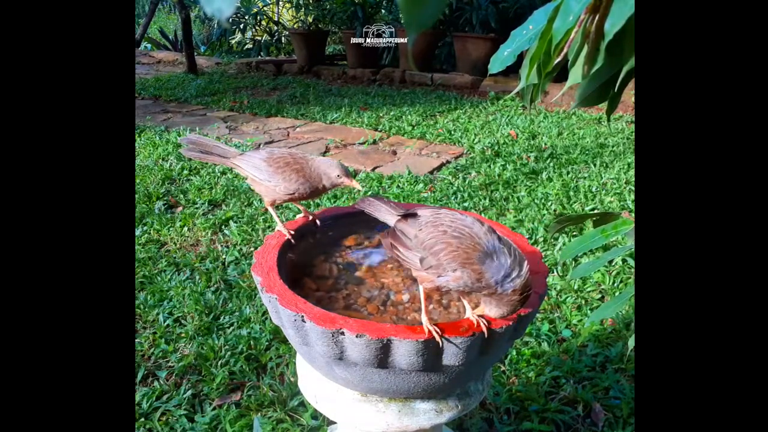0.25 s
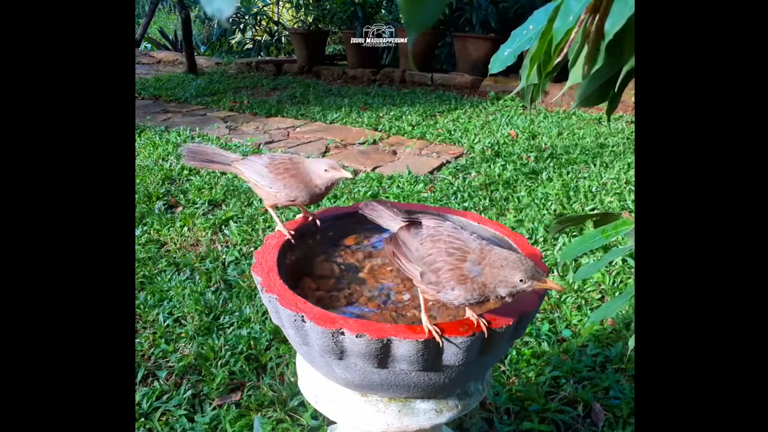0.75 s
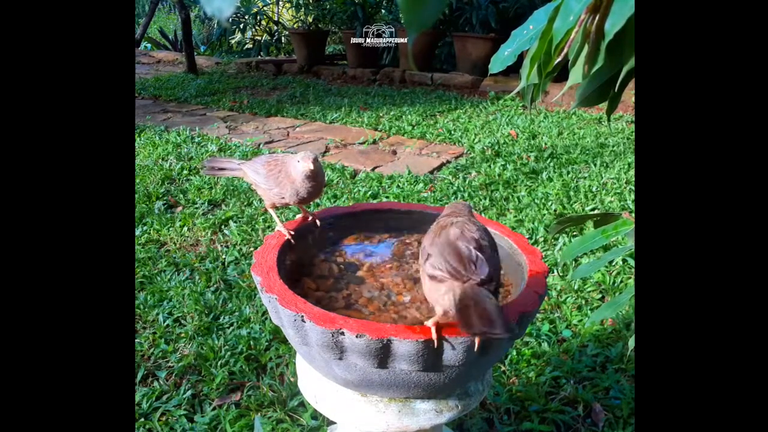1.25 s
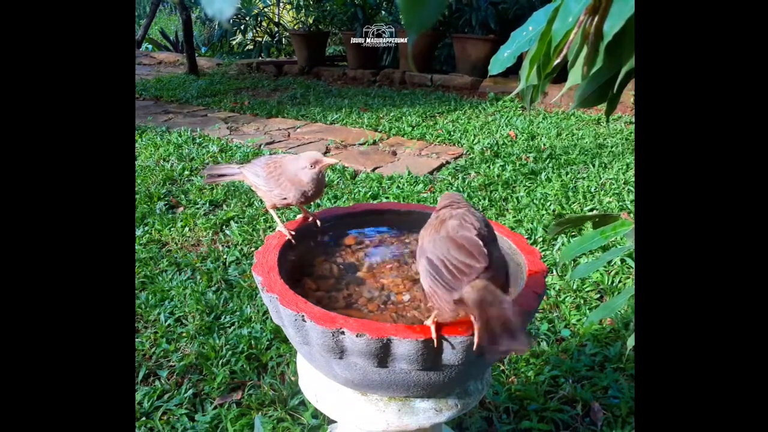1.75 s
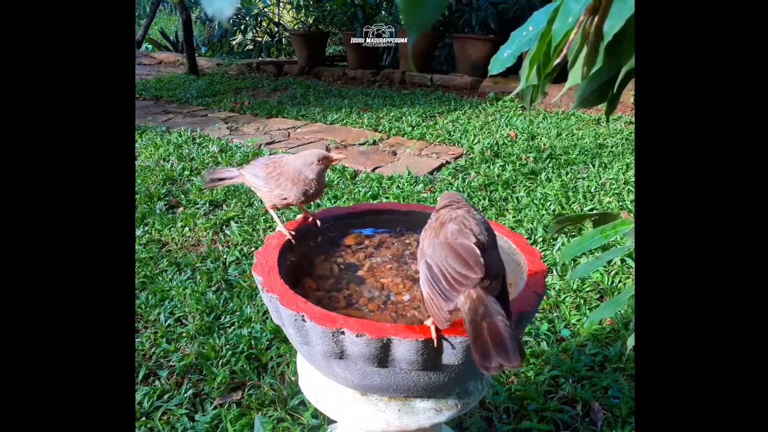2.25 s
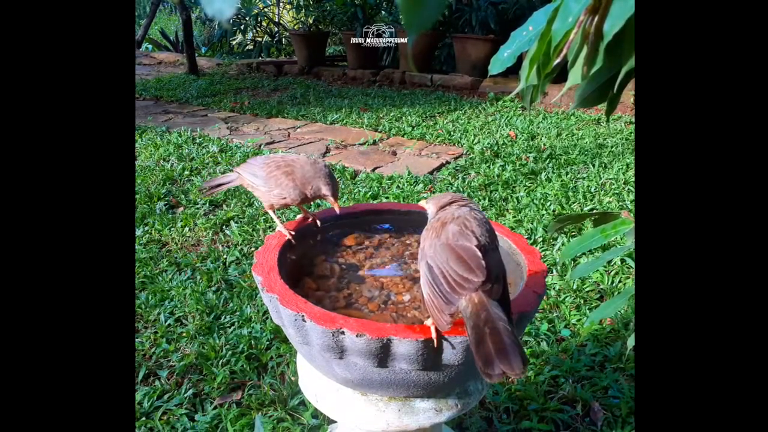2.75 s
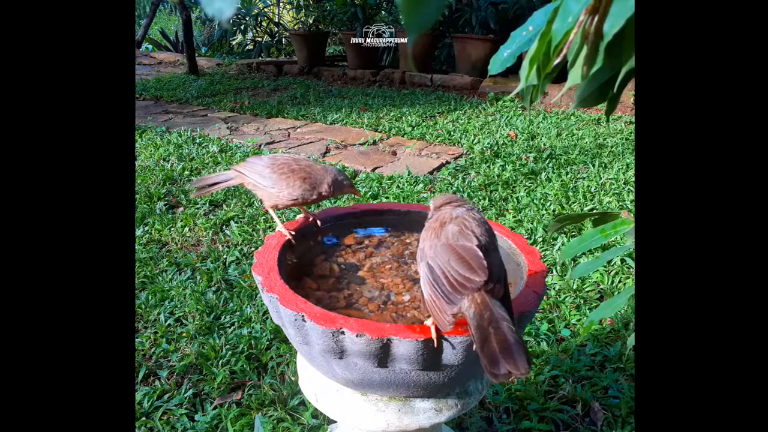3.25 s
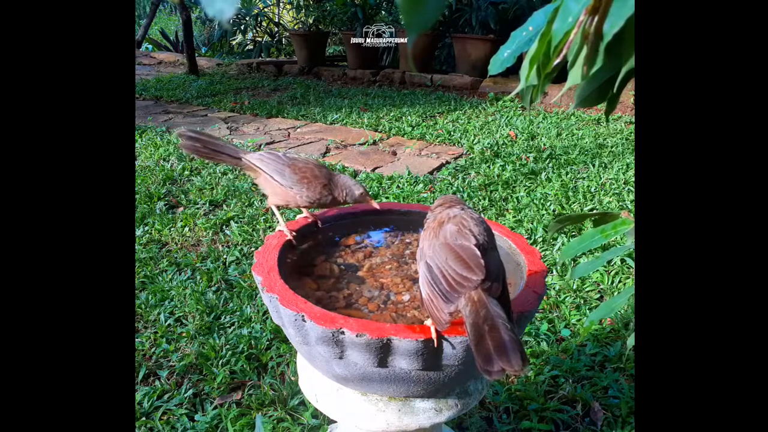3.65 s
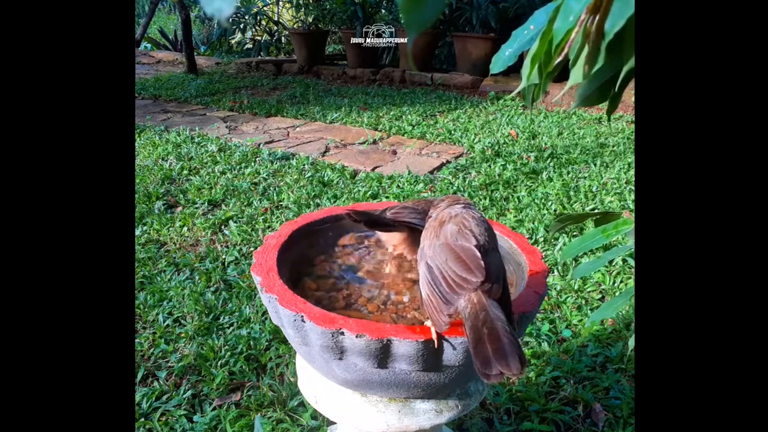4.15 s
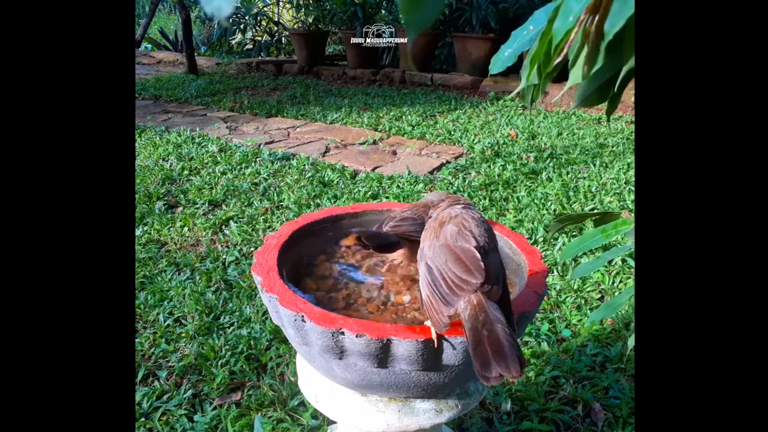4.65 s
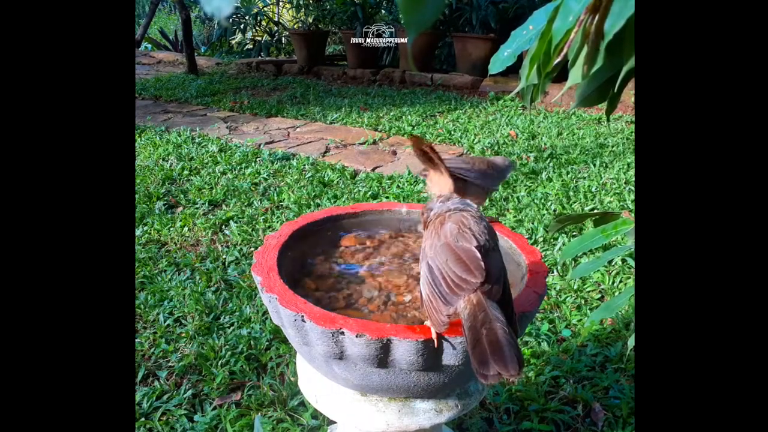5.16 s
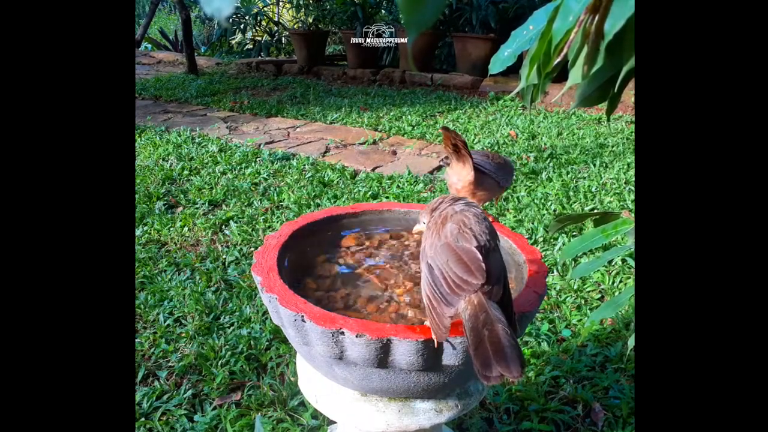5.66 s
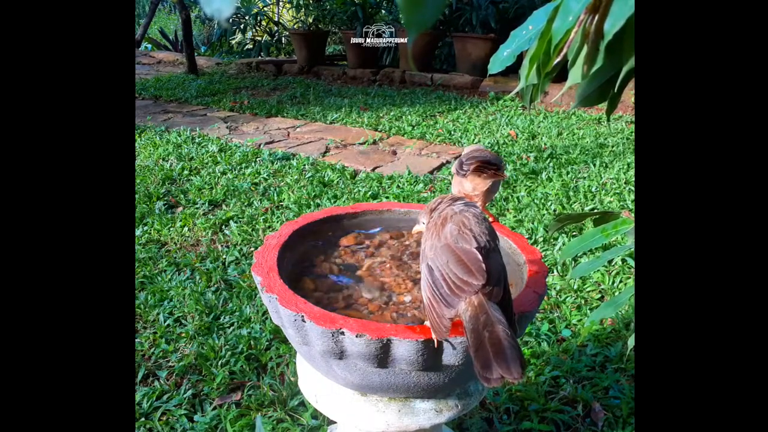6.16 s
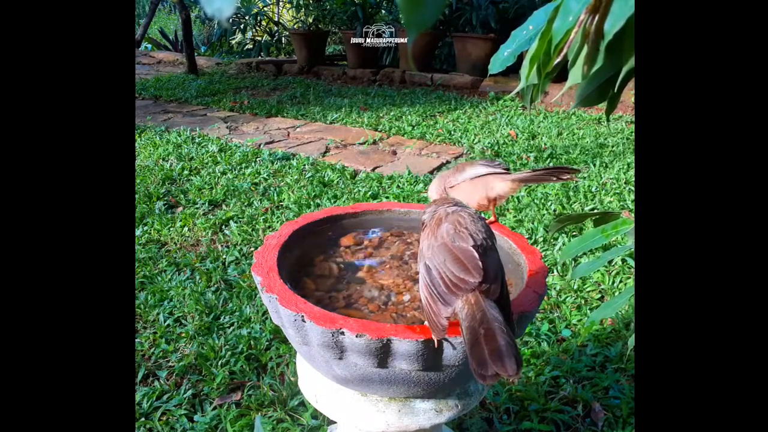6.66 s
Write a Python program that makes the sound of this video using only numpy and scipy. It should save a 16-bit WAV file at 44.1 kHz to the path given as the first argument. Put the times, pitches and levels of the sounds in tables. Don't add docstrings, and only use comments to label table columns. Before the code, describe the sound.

Birds at a garden bath ruffle feathers and coo softly, one chirps and drops in with a loud watery plop, over insects and distant engine hum.

```python
import sys
import numpy as np
from scipy import signal
from scipy.fft import rfft, irfft, next_fast_len
from scipy.io import wavfile
from scipy.ndimage import map_coordinates

SR = 44100
rng = np.random.default_rng(int(sys.argv[2]) if len(sys.argv) > 2 else 0)


def waveform_to_disk(signal):
    frames = np.transpose(np.atleast_2d(signal))
    scaled = np.clip(frames, -1, 1) * 32767
    samples = np.round(scaled).astype(np.int16)
    wavfile.write(sys.argv[1], SR, samples)


def voltage_ratio(level):
    return 10 ** (np.asarray(level, float) / 20)


N = 304731


def unit(x):
    return x / np.sqrt(np.mean(x ** 2) + 1e-20)


def along(points, hz):
    f, v = np.transpose(points)
    return np.interp(np.log(hz + 1), np.log(f + 1), v)


def wobble(rate, size=N):
    knots = rng.standard_normal(int(size * rate / SR) + 4)
    return map_coordinates(knots, [np.arange(size) * rate / SR])


def filtered(x, response):
    m = next_fast_len(x.shape[-1] + 8192)
    spectrum = rfft(x, m) * response(np.fft.rfftfreq(m, 1 / SR))
    return irfft(spectrum, m)[..., :x.shape[-1]]


def peak(hz, width_hz):
    return lambda f: 1j * f * width_hz / (hz * hz - f * f + 1j * f * width_hz)


def add(out, s, x):
    x = x[:, max(0, -round(s * SR)):]
    part = out[:, max(0, round(s * SR)):][:, :x.shape[1]]
    part += x[:, :part.shape[1]]


def placed(x, pan_db, lag, wet_db, scale=1, rise=0.0031, alike=0.092):
    # (frequency [Hz], t60 [s])
    tree_decay = [(500, 0.49), (2000, 0.72), (5000, 0.74), (10000, 0.7)]
    noise = rng.standard_normal((3, int(SR * min(.5, .05 + .6 * scale))))
    hz, t, z = signal.stft(noise[:2] + alike * noise[2], SR, nperseg=256)
    swell = 1 - np.exp(-(t + 0.0026) / rise)
    decay = voltage_ratio(-60 * t / (scale * along(tree_decay, hz))[:, None])
    tail = signal.istft(z * swell * decay, SR, nperseg=256)[1]
    wet = signal.fftconvolve(x[None], tail / np.linalg.norm(tail[0]), axes=1)
    delays = np.array([[60 + lag], [60 - lag]])
    direct = np.pad(x, (0, wet.shape[1] - len(x)))
    direct = filtered(direct, lambda f: np.exp(-1j * np.pi * f / SR * delays))
    return (direct + voltage_ratio(wet_db) * wet) * voltage_ratio(np.array([[pan_db / 2], [-pan_db / 2]]))


def coo(out, s, hz, db, wet_db):
    breath = 1 + voltage_ratio(-16) * wobble(400, size=len(hz))
    gain = voltage_ratio(db + 4.0 + 1.4 * wobble(58.6, size=len(hz))) * breath
    voice = gain * np.sin(2 * np.pi * np.cumsum(hz) / SR)
    add(out, s, placed(voice, pan_db=5.0, lag=-11, wet_db=wet_db, scale=0.54, rise=0.014, alike=0.068))


def doves(out):
    # (time [s], length [s], chest pitch [Hz], time in high register [s], level [dB])
    near_coos = [
        (-.07, 0.45, 685.4, 0.24, -48.5),
        (0.864, 0.44, 669.3, 0.24, -52.5),
        (1.523, .41, 653.7, .14, -53),
        (2.179, 0.38, 655.3, 0, -53),
    ]
    # (time [s], length [s], first pitch [Hz], last pitch [Hz], level [dB])
    murmurs = [
        (0.282, .14, 773, 739, -55.5),
        (.34, 0.13, 671, 660, -57.5),
        (0.738, 0.11, 626, 712, -57.5),
        (.8, 0.121, 837, 761, -52),
        (0.899, 0.246, 802, 781, -54.5),
        (1.24, 0.07, 875, 816, -57),
        (6.703, 0.16, 580, 617, -75),
    ]
    scoop_hz, scoop_s = 71, 0.0407
    sag_hz, sag_power = 95, 5.53
    break_s, leap_s, return_s, high_db = .122, 0.0049, .009, 5
    leap_hz, leap_sag_hz_per_s = 104.96, 200.3
    quaver_hz = 8.2
    swell_s, fade_s, tire_db = 0.075, 0.057, 7

    def switch(t, width_s):
        return (1 + np.tanh(t / width_s)) / 2

    for s, length, chest_hz, high_s, db in near_coos:
        t = np.arange(0, length, 1 / SR)
        fall_back = switch(break_s + high_s + return_s - t, return_s)
        high = switch(t - break_s, leap_s) * fall_back * (high_s > .03)
        chest = chest_hz - scoop_hz * np.exp(-t / scoop_s) - sag_hz * (t / length) ** sag_power
        leap = leap_hz - leap_sag_hz_per_s * (t - break_s) + quaver_hz * wobble(44.9, size=len(t))
        shape = np.clip(np.minimum(t / swell_s, (length - t) / fade_s), 1e-3, 1)
        level_db = db + high_db * high - tire_db * (t / length) ** 5.4 + 20 * np.log10(shape)
        coo(out, s, chest + high * leap, level_db, wet_db=-3.0)
    for s, length, first_hz, last_hz, db in murmurs:
        u = np.linspace(0, 1, int(length * SR))
        arch_db = 7 * np.log10(np.sin(np.pi * u) ** 2 + 1e-6)
        coo(out, s, first_hz + (last_hz - first_hz) * u, db + arch_db, wet_db=-0.5)


def insects():
    # (frequency [Hz], width [Hz], click rate [1/s], pulsing [0-1], level [dB])
    choirs = [(10410, 470, 110, 0.36, -60), (8205, 390, 121, 0.1, -65.5), (7370, 990, 61, 0.16, -69.5)]
    # (period [s], time of one crest [s], depth [dB])
    surges = [(1.34, 1.14, 3.5), (2.7, 1.33, 0.5), (.655, 1.15, 2.5)]
    t, total = np.arange(N) / SR, 0
    for (hz, width_hz, rate, pulsing, db), (every, crest, depth_db) in zip(choirs, surges):
        beat = 1 + pulsing * np.sin(2 * np.pi * rate * t + 2.4 * wobble(6))
        band = filtered(
            beat * rng.standard_normal((2, N)),
            lambda f: peak(hz, width_hz)(f) * peak(hz, 2.5 * width_hz)(f) / (1 + (f / 11400) ** 40))
        surge_db = depth_db * np.cos(2 * np.pi * (t - crest) / every)
        total = total + unit(band) * voltage_ratio(db + surge_db + 1.1 * wobble(9.5) + np.array([[1.1], [-1.1]]))
    bout_every_s, bout_at_s, bout_sharpness = 0.5, 1.27, 3.6
    bouts = np.cos(np.pi * (t - bout_at_s) / bout_every_s) ** 2
    trill = filtered(rng.standard_normal((2, N)), lambda f: peak(7250, 150)(f) ** 2)
    return total + voltage_ratio(-65.5) * unit(trill) * bouts ** bout_sharpness


def engine():
    # (frequency [Hz], width [Hz], level [dB])
    hum_lines = [(33.28, 1, -62), (54.39, 1.1, -59.5), (66.87, 2.07, -57.5), (75.26, 2.1, -66.5),
                 (226.2, 3.4, -77.5)]
    total = 0
    for hz, width_hz, db in hum_lines:
        line = filtered(rng.standard_normal(N), lambda f: peak(hz, width_hz)(f) ** 2)
        total = total + voltage_ratio(db) * unit(line)
    return total * voltage_ratio(np.array([[.55], [-.55]]))


def air():
    # (frequency [Hz], density [dB per Hz])
    floor_spectrum = [(12, -23), (20, -10.5), (74, -2.5), (136, -11), (478, -26.5), (1070, -33),
                      (1970, -36), (5690, -44.5), (7110, -31), (8170, -28.5), (8880, -29.5), (10200, -15),
                      (11400, -28), (12400, -76), (15500, -61)]
    # (frequency [Hz], correlation [0-1])
    likeness = [(30, 0.98), (125, 0.94), (300, 0.67), (1000, 0.0009), (4000, 0), (12000, 0.11)]

    def spread(f):
        turn = np.arccos(np.clip(along(likeness, f), -1, 1)) / 2
        return voltage_ratio(along(floor_spectrum, f)) * [np.cos(turn), np.sin(turn)]

    mid, side = filtered(rng.standard_normal((2, N)), spread)
    level_db = -54 + 0.6 * wobble(1.16) + np.array([[.55], [-.55]])
    return voltage_ratio(level_db) * unit(np.array([mid + side, mid - side]))


def far_birds(out, calls, overtones, wet_db, scale, pan_db, warble_hz, warble_rate):
    for s, length, first_hz, last_hz, db in calls:
        u = np.linspace(0, 1, int(length * SR))
        glide_hz = last_hz + (first_hz - last_hz) * np.exp(-3.5 * u)
        phase = 2 * np.pi * np.cumsum(glide_hz + warble_hz * wobble(warble_rate, size=len(u))) / SR
        tone = sum(voltage_ratio(level_db) * np.sin(k * phase) for k, level_db in overtones)
        voice = voltage_ratio(db + 8.5 - wet_db) * np.sin(np.pi * u) ** 0.14 * tone
        add(out, s, placed(voice, pan_db, lag=-14.0, wet_db=wet_db, scale=scale, rise=0.0055, alike=0.41))


def feathers(out):
    # (middle [s], length [s], level [dB], dullness [0-1, below 0 brighter])
    rustles = [(0.258, 0.064, -56.5, 0), (0.32, 0.087, -58.5, 0.2), (0.394, 0.073, -47.5, 0.22),
               (0.441, 0.12, -50, 0.3), (0.558, 0.12, -62, 0.1), (0.695, 0.074, -60.5, .3),
               (0.848, 0.28, -61, 0.25), (1.099, 0.25, -66, .2), (1.628, 0.14, -66, 0),
               (3.952, 0.021, -56.5, 0.2), (3.993, 0.046, -54.5, 0.96), (5.098, 0.031, -54, -.2),
               (5.202, 0.069, -62.5, -.5), (5.381, 0.062, -56, -.5), (5.596, 0.042, -64, 0),
               (5.697, 0.11, -68, 0), (4.903, 0.032, -68, 0.4), (1.519, 0.071, -77, 0.2),
               (1.241, 0.061, -67, 1), (6.748, 0.016, -59.5, 0.8), (6.827, 0.14, -65, 0.5)]
    # (time [s], level [dB])
    wingbeats = [(.4, -54), (.45, -55.5), (0.521, -60), (0.781, -56), (0.839, -55.5), (0.899, -58),
                 (0.968, -57), (1.05, -57.5), (1.107, -56), (1.169, -63), (1.23, -58), (1.3, -66)]
    for s, length, db, dull in rustles:
        n = int(2 * length * SR)
        grains = rng.standard_normal((2, n)) * voltage_ratio(3.35 * wobble(600, size=n))

        def hiss(f):
            dulling = voltage_ratio(-9 * dull * np.log2(1 + f / 1500))
            return (f / (f + 900)) ** 2 * dulling / (1 + (f / 14800) ** 8)

        grains = filtered(grains + 0.038 * grains[::-1], hiss)
        add(out, s - length, voltage_ratio(db) * unit(grains) * np.hanning(n) ** 1.28)
    for s, db in wingbeats:
        push = filtered(rng.standard_normal(1100), lambda f: peak(350, 900)(f) / (1 + (f / 1000) ** 4))
        push = voltage_ratio(db) * unit(push) * np.hanning(1100)
        add(out, s - .012, push * voltage_ratio(np.array([[.6], [-.6]])))


def rim_ticks(out):
    # (time [s], peak level [dB], ring [Hz], t60 [s], left over right [dB])
    ticks = [(0.375, -42, 4670, 0.0087, .5), (3.934, -56, 4300, 0.0078, 0), (3.955, -49, 5600, 0.0099, 1),
             (3.974, -44, 2960, .008, -4), (3.9779, -28.5, 8400, 0.0038, -6),
             (3.986, -38, 6200, 0.0076, 10), (4.439, -44.5, 2940, 0.0053, -.5),
             (6.671, -49, 1680, 0.0074, 7), (6.7426, -36, 5900, 0.0025, 7),
             (6.746, -46.5, 2790, 0.0092, -1), (6.751, -49, 2800, .005, 1), (6.8166, -38, 2920, 0.0023, 1)]
    t = np.arange(SR // 10) / SR
    for s, db, hz, t60, pan_db in ticks:
        snap = 0.99 * rng.standard_normal(len(t)) + np.sin(2 * np.pi * hz * t)
        snap = snap * voltage_ratio(-60 * t / t60)
        snap = filtered(snap, lambda f: f / (f - 1200j) / (1 + (f / 11000) ** 6))
        add(out, s - .0007, placed(voltage_ratio(db) * snap, pan_db, lag=-.3, wet_db=-14, scale=.08))


def chirp(out):
    length_s, edge_s = 0.037, .011
    start_hz, fall_hz_per_s = 3688, 18500
    t = np.arange(0, length_s, 1 / SR)
    phase = 2 * np.pi * np.cumsum(start_hz - fall_hz_per_s * t) / SR
    shape = np.clip(np.minimum(t, length_s - t) / edge_s, 0, 1) ** 2.3
    shape = shape * voltage_ratio(0.84 * wobble(53, size=len(t)))
    octave = voltage_ratio(5 - 6.5 * t / length_s) * np.sin(2 * phase)
    twelfth = voltage_ratio(-10) * np.sin(3 * phase)
    voice = voltage_ratio(-36) * shape * (np.sin(phase) + octave + twelfth)
    add(out, 3.506, placed(voice, pan_db=-5.5, lag=-1.8, wet_db=-20, scale=0.29, alike=0.42))


def plop(out):
    # (time [s], peak level [dB], pitch [Hz], t60 [s])
    bubbles = [
        (3.9765, -17, 980, 0.019),
        (3.948, -53.5, 1900, 0.048),
    ]
    late_db, late_t60_s = -18.5, 0.18
    t = np.arange(SR // 10) / SR
    for s, db, hz, t60 in bubbles:
        phase = 2 * np.pi * hz * (t + 0.00071 * (1 - np.exp(-t / 0.00076)))
        ring = voltage_ratio(-60 * t / t60) + voltage_ratio(late_db - 60 * t / late_t60_s)
        burst = 1 / (1 + (t / 0.026) ** 12)
        onset = 1 - np.exp(-t / .0008)
        bubble = voltage_ratio(db) * ring * burst * onset * np.sin(phase)
        add(out, s, placed(bubble, pan_db=1.2, lag=-2.2, wet_db=-24, scale=.2))


def scene():
    # (time [s], length [s], first pitch [Hz], last pitch [Hz], level [dB])
    far_calls = [(0.135, 0.043, 4110, 3340, -76), (0.389, 0.075, 3500, 2454, -64.5),
                 (0.834, 0.07, 3816, 3925, -61.5), (0.872, 0.0384, 4000, 4240, -59),
                 (4.092, 0.041, 3520, 2884, -54.5), (4.095, 0.033, 2880, 2395, -60),
                 (4.303, 0.033, 3134, 2008, -50), (4.313, 0.024, 2154, 1880, -52),
                 (4.431, 0.032, 2293, 2090, -49), (4.451, 0.037, 2040, 1778, -56),
                 (4.489, 0.053, 2130, 1970, -61), (5.293, 0.055, 2589, 2268, -61),
                 (5.338, 0.04, 2187, 2560, -63.5), (6.32, 0.056, 2656, 3320, -63.5),
                 (6.347, 0.09, 3390, 4156, -57.5), (6.718, 0.029, 3010, 2870, -68.5),
                 (6.773, .04, 3000, 2800, -76), (6.84, 0.04, 2910, 2870, -68)]
    # (time [s], pitch [Hz], level [dB])
    twitter = [(.288, 5900, -68), (.478, 5650, -68), (.508, 5000, -65), (.675, 4950, -66.5),
               (5.85, 5720, -72), (5.87, 4750, -71), (6.04, 5750, -75), (6.05, 5080, -65.5),
               (6.17, 5820, -70), (6.185, 5020, -63)]
    # (time [s], level [dB])
    whistle_times = [(0.349, -75.5), (1.861, -74), (4.7, -74), (6.101, -72)]
    # (delay [s], length [s], first pitch [Hz], last pitch [Hz], level [dB])
    whistle_notes = [
        (0, .17, 1340, 1388, -2),
        (.16, .12, 1520, 1512, 1),
    ]
    # (time [s], length [s], first pitch [Hz], last pitch [Hz], level [dB])
    slurs = [
        (3.25, .17, 1652, 1359, -71.5),
        (3.38, .24, 1560, 1445, -74),
    ]
    # (time [s], length [s], first pitch [Hz], last pitch [Hz], level [dB])
    cries = [
        (1.372, 0.23, 1008, 997, -83.5),
        (1.543, 0.28, 1003, 1016, -84.5),
        (5.684, 0.091, 972, 1027, -74),
        (5.737, 0.056, 1066, 1022, -65.5),
        (5.814, 0.11, 1010, 961, -79),
    ]
    # (multiple of the pitch, level [dB])
    reed = [(1, -1), (2, -5.5), (3, -16), (4, -19), (5, -18)]
    tweets = [(s, .07, hz * (1 + .015), hz, db) for s, hz, db in twitter]
    whistles = []
    for s, db in whistle_times:
        for after, length, first_hz, last_hz, note_db in whistle_notes:
            whistles.append((s + after, length, first_hz, last_hz, db + note_db))
    whistles.extend(slurs)

    out = insects() + engine() + air()
    doves(out)
    far_birds(out, far_calls, [(0.99, 0)], wet_db=10.5, scale=0.6, pan_db=1.5, warble_hz=83.6, warble_rate=200)
    far_birds(out, tweets, [(1, 0)], wet_db=7, scale=0.45, pan_db=2.0, warble_hz=240, warble_rate=500)
    far_birds(out, whistles, [(1, 0)], wet_db=9, scale=.8, pan_db=.5, warble_hz=60, warble_rate=110)
    far_birds(out, cries, reed, wet_db=4, scale=0.63, pan_db=-13.5, warble_hz=13.2, warble_rate=23.7)
    feathers(out)
    rim_ticks(out)
    chirp(out)
    plop(out)
    return out


def squelch(x):
    from_hz, bar_db, bar_db_per_khz = 11650, -100.5, 2
    hz, _, z = signal.stft(x, SR, nperseg=2048)
    power = np.mean(np.abs(z[:, :1024].reshape(2, 64, 16, -1)) ** 2, axis=(0, 2))
    band_hz = hz[:1024:16]
    bar = voltage_ratio(bar_db + bar_db_per_khz * (band_hz - from_hz) / 1000) ** 2 * (band_hz > from_hz)
    kept = np.pad(np.repeat(power > bar[:, None], 16, axis=0), ((0, 1), (0, 0)))
    return signal.istft(z * kept, SR, nperseg=2048)[1][:, :N]


def top_cut(x):
    return signal.sosfilt(signal.butter(12, 15640, fs=SR, output="sos"), x)


def record(dry):
    band = filtered(dry, lambda f: f ** 4 / (f ** 4 + 29 ** 4) * (f < 15650))
    mix = squelch(band)
    return top_cut(mix)


dry = scene()
out = record(dry)
waveform_to_disk(out)
```